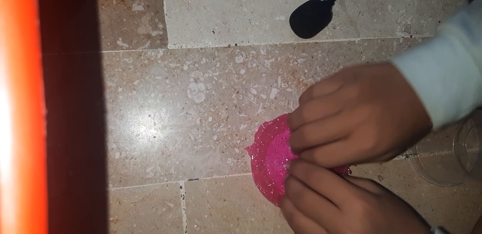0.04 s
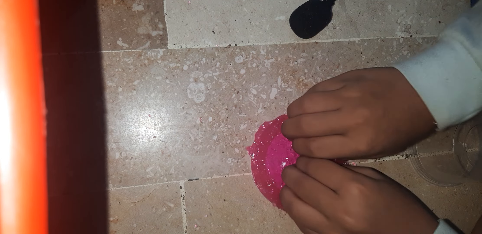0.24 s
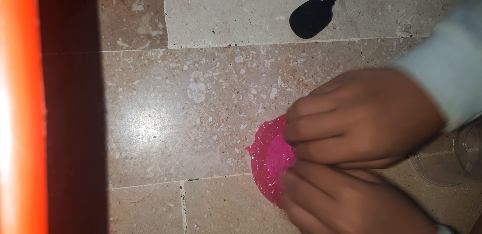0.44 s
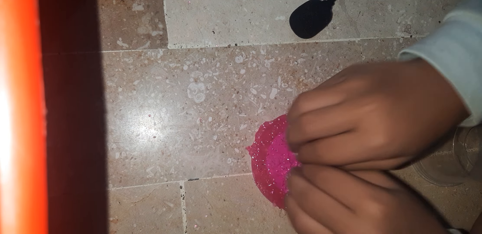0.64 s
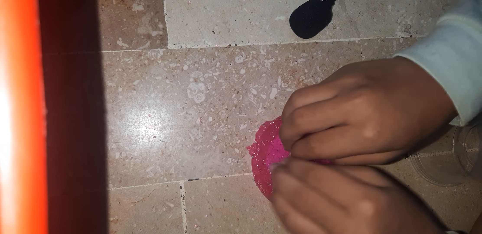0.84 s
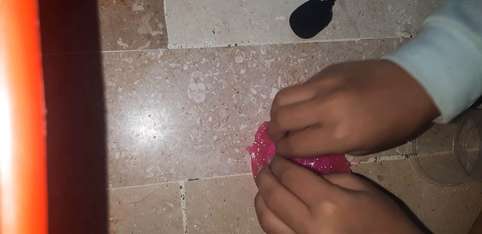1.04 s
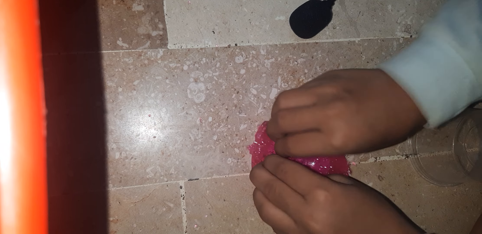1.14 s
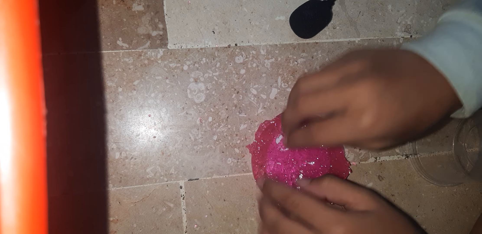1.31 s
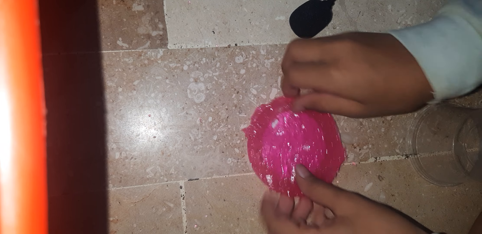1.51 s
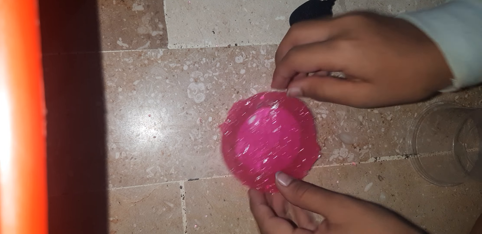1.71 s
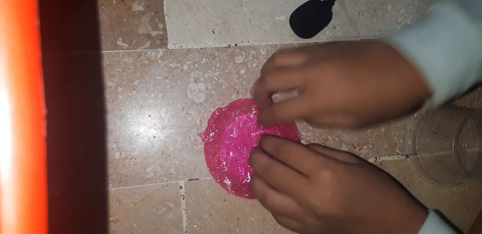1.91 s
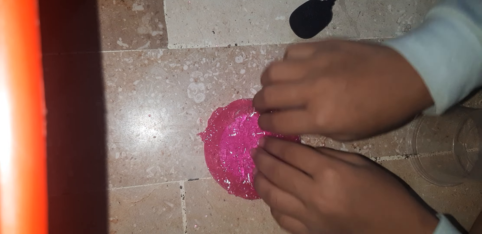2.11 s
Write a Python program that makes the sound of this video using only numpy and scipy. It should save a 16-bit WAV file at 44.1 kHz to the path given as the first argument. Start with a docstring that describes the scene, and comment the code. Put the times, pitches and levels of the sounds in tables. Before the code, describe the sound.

Close, dry slime pops and bright clicks burst unevenly through the first second, each with a short hard room ring; then quieter ticks and slippery finger slides, another loud pop, small clicks, over faint air noise and hum.

```python
"""Fingers poke and peel a lump of sticky slime on a tiled floor, close to a small microphone.
Air noise and a faint hum run from the start and sink; soon a finger slides (hiss and resonant grains)
and thin films snap (bright ticks with ring and fizz). Then skin peels (random ticks in resonances) and
air pockets pop (two hollow cavity tones and a push of air), with a hard room ringing after them.
Later come mostly slides, one more loud pop with its snap, and a few small sounds at the end."""
import sys
import numpy as np
from scipy import signal
from scipy.fft import rfft, irfft
from scipy.io import wavfile
from scipy.ndimage import uniform_filter1d

SR = 44100
rng = np.random.default_rng(int(sys.argv[2]) if len(sys.argv) > 2 else 0)


def master_out(mix):
    """Clip the mix to full scale and print it as 16-bit PCM to the path in sys.argv[1]."""
    frames = np.transpose(np.atleast_2d(mix))
    ceiling = np.clip(frames, -1, 1)
    pcm = np.round(ceiling * 32767).astype(np.int16)
    wavfile.write(sys.argv[1], SR, pcm)


def boost(x):
    """Linear amplitude factor 10**(x/20) for a level x in decibels (scalar or array-like)."""
    u = np.asarray(x, float) / 20
    return 10 ** u


N = 94815


def rms_one(x):
    """Scale a signal to an rms of 1."""
    return x / np.sqrt(np.mean(x ** 2) + 1e-20)


def in_time(rows):
    """Join (seconds, value) rows by straight lines, one value per sample."""
    s, value = np.transpose(rows)
    return np.interp(np.arange(N) / SR, s, value)


def at_hz(points, hz):
    """Read a (Hz, value) table with frequency on a log axis, as we hear pitch."""
    table_hz, value = np.array(points).T
    return np.interp(np.log(hz + 1), np.log(table_hz), value)


def colour(x, spectrum):
    """Give a signal the shape of a spectrum table, at an rms of 1."""
    hz = np.arange(N // 2 + 1) * SR / N
    return rms_one(irfft(rfft(x) * boost(at_hz(spectrum, hz)), N))


def resonate(x, hz, width_hz):
    """Ring like a small hollow or skin: a two-pole resonance, the narrower the longer."""
    r = np.exp(-np.pi * width_hz / SR)
    return signal.lfilter([1 - r], [1, -2 * r * np.cos(2 * np.pi * hz / SR), r * r], x)


def bandpass(x, edges_hz, order):
    """Keep only what lies between two frequencies."""
    return signal.sosfilt(signal.butter(order, edges_hz, "band", fs=SR, output="sos"), x)


def add(out, s, grain):
    """Mix a short sound in at a time in seconds."""
    i = int(s * SR)
    out[i:i + len(grain)] += grain[:N - i]


def stroke(s, length, edge_s):
    """Start sample and a fade-in, hold, fade-out shape with a short silent tail."""
    start = int(s * SR)
    t = np.arange(min(int((length + .01) * SR), N - start)) / SR
    return start, np.clip(np.minimum(t, length - t) / edge_s, 0, 1)


HUM_WAVER_DB = 2.5
# Colour of the air noise. Each row: frequency in Hz, relative level in dB.
AIR = [(24, -17), (60, -1.5), (130, 3.5), (324, 4), (497, 2.5), (744, -0.5), (1110, -6), (2250, -11.5),
       (7180, -18.5), (14200, -24.5), (16500, -38)]
# Loudness of the air noise; the hum follows it. Each row: time in seconds, level in dB.
AIR_LEVEL = [(0, -47.5), (.2, -48.5), (.8, -56), (1.3, -56.5), (2.15, -58.5)]
# Hum tones. Each row: frequency in Hz, middle peak level in dB over the rms of the air noise.
HUM = [(58, 0), (253, -9), (754, -7.5), (1254, -14)]


def air():
    """Coloured noise for the moving air, and steady tones whose level wavers for the hum."""
    t = np.arange(N) / SR
    out = colour(rng.standard_normal(N), AIR)
    for hz, db in HUM:
        waver = np.interp(t, np.linspace(0, t[-1], 12), rng.standard_normal(12))
        out = out + boost(db + HUM_WAVER_DB * waver) * np.sin(2 * np.pi * (hz * t + rng.random()))
    return boost(in_time(AIR_LEVEL)) * out


SLIDE_BAND_HZ, SLIDE_EDGE_S = (2100, 16000), 0.003
SLIDE_PATCHY_DB, SLIDE_PATCH_S = 5.5, 0.003
SLIDE_GRAINS_PER_S = 1800
SLIDE_WIDTH_SHARE = 0.2  # resonance width as a share of its frequency
SLIDE_OVERTONE_DB = -8  # octave relative to the resonance
# Fingers slide over the wet skin. Each row: start in seconds, length in seconds, hiss level in dB,
# resonance in Hz, level of the resonant grains in dB (the resonance gets 4 dB less, its octave 12).
SLIDES = [(0.068, 0.033, -47, 4650, -55), (1.494, 0.022, -57, 4940, -68), (1.517, 0.039, -49.5, 5160, -49),
          (1.557, 0.049, -53, 7400, -48.5), (1.61, 0.018, -45, 3800, -51), (1.626, 0.019, -58, 3760, -58),
          (1.733, 0.014, -54, 4460, -51), (1.75, 0.07, -68, 4300, -51.5), (2.087, 0.036, -59, 4850, -62)]


def slides():
    """Rubbing gives a soft hiss, patchy band by band, and grains ring a resonance and its octave."""
    edges = np.geomspace(*SLIDE_BAND_HZ, 7)
    hiss = 0
    for low, high in zip(edges, edges[1:]):
        patch = rms_one(uniform_filter1d(rng.standard_normal(N), int(SLIDE_PATCH_S * SR)))
        band = bandpass(rng.standard_normal(N), [low, high], 1)
        hiss = hiss + band * boost(SLIDE_PATCHY_DB * uniform_filter1d(patch, 100))
    hiss = rms_one(hiss)
    grains = rng.standard_normal(N) * (rng.random(N) < SLIDE_GRAINS_PER_S / SR)
    out = np.zeros(N)
    for s, length, hiss_db, hz, tone_db in SLIDES:
        i, shape = stroke(s, length, SLIDE_EDGE_S)
        j = i + len(shape)
        tone = 0
        for k in (1, 2):
            width_hz = k * SLIDE_WIDTH_SHARE * hz
            once = resonate(grains[i:j], k * hz, width_hz)
            twice = resonate(once, k * hz, width_hz)
            tone = tone + boost(SLIDE_OVERTONE_DB * (k - 0.5)) * rms_one(twice)
        add(out, s, shape * (boost(hiss_db) * hiss[i:j] + boost(tone_db) * tone))
    return out


SNAP_WIDTH_PER_SPREAD = 1.15
SNAP_FIZZ_DB, SNAP_FIZZ_T60_S = -19, 0.012  # level against the tick, time to fall 60 dB
SNAP_RING_DB, SNAP_RING_T60_S = -18, 0.005
# Thin films snap. Each row: time in seconds, tick level in dB, centre in Hz, spread in Hz.
SNAPS = [(0.0732, -20.5, 5270, 2700), (0.0776, -25, 4450, 1320), (0.2287, -8, 5100, 3000),
         (0.2337, -9, 11700, 2830), (0.241, -13.5, 6100, 3200), (0.297, -27.5, 11200, 1930),
         (0.3601, -25.5, 4500, 2820), (0.3674, -20.5, 5600, 1920), (0.48, -21, 7700, 2670),
         (0.4848, 0.5, 5160, 1700), (0.4972, -15, 7150, 3190), (0.5524, -14.5, 11500, 1830),
         (0.5741, -22.5, 6660, 1090), (0.7151, -14, 7100, 3460), (0.716, -6, 6850, 3570),
         (0.7197, -7, 12200, 1810), (0.7369, -28, 8100, 2070), (0.819, -12.5, 8400, 4000),
         (0.9223, -14, 7600, 3800), (0.9268, -6, 7500, 3500), (0.9302, -14, 7000, 2400),
         (0.9513, 0, 7200, 2900), (1.0606, -8.5, 9660, 2400), (1.0729, -25.5, 9900, 3510),
         (1.1276, -19, 8500, 3400), (1.1351, -9, 8000, 4200), (1.1668, -19, 8500, 3400),
         (1.4936, -31, 6000, 4500), (1.5864, -32, 8000, 2400), (1.2396, -25.5, 7600, 2500),
         (1.2902, -30.5, 9910, 2950), (1.3649, -27.5, 6280, 3000), (1.366, -28, 6280, 3000),
         (1.4552, -28.5, 8400, 4060), (1.46, -30, 6100, 3360), (1.598, -29, 7500, 3000),
         (1.6769, -33, 5730, 1400), (1.73, -22, 5000, 1680), (1.814, -1.5, 6630, 3100),
         (1.9231, -21.5, 6470, 3600), (1.9434, -13, 7600, 3600), (1.948, -25.5, 7000, 4000),]


def snaps():
    """A tearing film gives a very short tick, a brief ring and a dying fizz around the tick's pitch."""
    out, lead = np.zeros(N), 32  # samples ahead of the tick's middle
    t = (np.arange(900) - lead) / SR
    after = np.maximum(t, 0)
    for s, db, hz, spread_hz in SNAPS:
        phase, shift = rng.random(2)
        width_hz = SNAP_WIDTH_PER_SPREAD * spread_hz
        tick = np.cos(2 * np.pi * (hz * t + phase)) * np.exp(-2 * (np.pi * width_hz * t) ** 2)
        edges = np.clip([hz - 1.5 * width_hz, hz + 1.5 * width_hz], 1500, 17000)
        fizz = rms_one(bandpass(rng.standard_normal(len(t)), edges, 1))
        fizz = fizz * (t > 0) * boost(SNAP_FIZZ_DB - 60 * after / SNAP_FIZZ_T60_S)
        ring_hz = hz * (.5 + 0.57 * shift)
        ring = np.sin(2 * np.pi * ring_hz * after) * boost(SNAP_RING_DB - 60 * after / SNAP_RING_T60_S)
        add(out, s - lead / SR, boost(db) * (tick + fizz + ring))
    return out


PEEL_SIZE_DB, PEEL_EDGE_S = 2.5, 0.003  # unevenness of the ticks, fade at each end
PEEL_SPAN_OCTAVES = 1.1  # how far the resonances reach around the centre
PEEL_WIDTH_SHARE = 0.25  # resonance width as a share of its frequency
# Skin peels off in crackle. Each row: start in seconds, length in seconds, level in dB,
# ticks per second, centre in Hz.
PEEL = [(0.221, 0.015, -36.5, 3800, 2500), (0.238, 0.14, -58.5, 780, 5850), (0.353, 0.026, -51, 520, 6400),
        (0.473, 0.025, -37, 2600, 4170), (0.493, 0.043, -51.5, 4200, 4600), (0.543, 0.073, -52, 470, 7740),
        (0.708, 0.017, -40.5, 3400, 7960), (0.805, 0.036, -54.5, 1200, 10100),
        (0.914, 0.018, -44, 1300, 5870), (1.005, 0.073, -55.5, 790, 7550), (1.1259, .015, -37, 4500, 3200),
        (1.157, 0.017, -43.5, 6000, 4600), (1.813, 0.0072, -34, 4200, 5640), (1.214, 0.056, -61, 770, 7900),
        (1.28, 0.027, -59, 640, 8500), (1.941, 0.0185, -49.5, 1800, 7000), (2.011, 0.027, -61.5, 990, 3860)]


def peel():
    """Skin lets go in random ticks of uneven size, dealt to short resonances around a centre."""
    sizes = boost(PEEL_SIZE_DB * np.minimum(rng.exponential(1, N), 3)) * rng.choice([-1, 1], N)
    draw, dealt = rng.random(N), rng.integers(0, 14, N)
    out = np.zeros(N)
    for s, length, db, per_s, centre_hz in PEEL:
        i, shape = stroke(s, length, PEEL_EDGE_S)
        j = i + len(shape)
        ticks = sizes[i:j] * (draw[i:j] < per_s / SR) * shape
        crackle = 0
        for k, hz in enumerate(np.geomspace(900, 15500, 14)):
            ring = resonate(ticks * (dealt[i:j] == k), hz, PEEL_WIDTH_SHARE * hz)
            even = np.sin(2 * np.pi * hz / SR) * np.sqrt(centre_hz / hz)  # evens out the resonances
            nearness = np.exp(-.5 * (np.log2(hz / centre_hz) / PEEL_SPAN_OCTAVES) ** 2)
            crackle = crackle + ring * even * nearness
        add(out, s, boost(db) * rms_one(crackle))
    return out


LONG_RING_T60_S, BRIEF_RING_T60_S = 0.016, 0.0084  # time to fall 60 dB
POP_RING_SHARE, POP_PUSH_SHARE = 0.78, 0.6
# Air pockets pop. Each row: time in seconds, level in dB before the ring and push shares,
# long-ringing cavity in Hz, brief cavity in Hz, brief cavity in dB relative to the long one.
POPS = [(0.2277, -0.5, 596, 1340, -13.5), (0.2343, -17, 650, 1330, -7), (0.3624, -30, 1170, 1190, 5),
        (0.4848, 1.5, 645, 1315, -3.5), (0.7158, -1.5, 645, 1400, 4.5), (0.9194, -30, 700, 1330, -6),
        (0.9224, -18, 1420, 400, -6), (0.9269, -8.5, 680, 1450, 0), (1.0609, -24.5, 690, 1370, -0.5),
        (1.1298, -26, 250, 1500, 4), (1.131, -30, 250, 3000, 6), (1.1366, -18, 560, 380, -2),
        (1.14, -28, 300, 500, -4), (1.1655, -33, 300, 1500, 10), (1.1702, -24, 370, 1480, -0.5),
        (1.3657, -33, 300, 1480, 0), (1.4618, -35, 231, 1180, -51), (1.81412, -10, 3550, 3000, -6),
        (1.81438, -8, 720, 1020, 10), (1.9223, -26.5, 676, 1300, -22), (1.948, -25.5, 206, 1270, -16)]


def pops():
    """A bursting pocket gives a suck, a push of air, and two cavity tones that die away."""
    out, lead = np.zeros(N), 64  # samples ahead of the burst
    t = (np.arange(1200) - lead) / SR
    after = np.maximum(t, 0)
    for s, db, long_hz, brief_hz, brief_db in POPS:
        long_share = 1 / (1 + boost(brief_db))
        mean_hz = long_share * long_hz + (1 - long_share) * brief_hz
        unit_s = 0.17 / mean_hz  # lower pockets burst more slowly
        rise = np.exp(-(np.minimum(t, 0) / (0.37 * unit_s)) ** 2)
        long_tone = np.cos(2 * np.pi * long_hz * t - .4) * boost(-60 * after / LONG_RING_T60_S)
        brief_tone = np.cos(2 * np.pi * brief_hz * t - .4) * boost(-60 * after / BRIEF_RING_T60_S)
        ring = rise * (long_share * long_tone + (1 - long_share) * brief_tone)
        suck = .5 * np.exp(-((t + 1.935 * unit_s) / (0.92 * unit_s)) ** 2)
        push = np.exp(-after / (0.29 * unit_s)) * rise - suck
        add(out, s - lead / SR, boost(db) * (POP_RING_SHARE * ring + POP_PUSH_SHARE * push))
    return out


ROOM_DB, ROOM_ONSET_S = -11, 0.0013  # gain of the tail, length of its fade-in
ROOM_MODES_HZ, ROOM_MODE_DB, ROOM_MODE_T60_S = (593, 703, 745), -28, 0.75  # lingering resonances
# How long the room rings. Each row: frequency in Hz, time to fall 60 dB in seconds.
ROOM_T60 = [(100, 0.45), (700, 0.52), (1500, 0.34), (4000, 0.32), (15000, 0.086)]
# How strongly the room rings. Each row: frequency in Hz, relative level in dB.
ROOM_COLOUR = [(100, 8.5), (520, 0.5), (640, -4.5), (760, 2.5), (1500, -2), (3500, -2), (7000, -6),
               (15000, 1)]


def room(x):
    """Hard walls scatter sound: third-octave noise bands die at their own rates, with a few modes."""
    t = np.arange(SR) / SR
    edges = 80 * 2 ** np.arange(0, 7.8, 1 / 3)
    tail = 0
    for low, high in zip(edges, edges[1:]):
        band = bandpass(rng.standard_normal(SR), [low, high], 2)
        tail = tail + band * boost(at_hz(ROOM_COLOUR, low) - 60 * t / at_hz(ROOM_T60, low))
    for hz in ROOM_MODES_HZ:
        mode = np.sin(2 * np.pi * (hz * t + rng.random()))
        tail = tail + mode * boost(ROOM_MODE_DB - 60 * t / ROOM_MODE_T60_S)
    tail = tail * np.clip(t / ROOM_ONSET_S - .5, 0, 1) / np.sqrt(SR / 20)
    return boost(ROOM_DB) * signal.fftconvolve(x, tail)[:N]


ECHO_S, ECHO_DB, ECHO_HZ, ECHO_WIDTH_HZ = 0.033, -26, 692, 28


def echo(x):
    """A far wall returns one late, dull reflection, narrowed to a band."""
    late = np.pad(x, (int(ECHO_S * SR), 0))[:N]
    return boost(ECHO_DB) * resonate(late, ECHO_HZ, ECHO_WIDTH_HZ)


SLIME_CUT_HZ = 75
# The hands come closer and in the end the room's share sinks.
# Each row: time in seconds, level sent to the room and echo in dB.
WET = [(0, -0.5), (.8, 0.5), (1.8, -4)]


def scene():
    """Slime close by without its deepest bass, its room tail and echo, and the air."""
    slime = slides() + snaps() + peel() + pops()
    slime = signal.sosfilt(signal.butter(2, SLIME_CUT_HZ, "high", fs=SR, output="sos"), slime)
    far = slime * boost(in_time(WET))
    return (air() + slime + room(far) + echo(far))[None]


def low_pass(x):
    """Removes everything above the highest recorded frequency."""
    return signal.sosfilt(signal.butter(12, 16820, fs=SR, output="sos"), x)


MIC_CUT_HZ = 54


def record(dry):
    """The microphone drops the deep bass, and peaks stop at full scale."""
    thin = signal.sosfilt(signal.butter(3, MIC_CUT_HZ, "high", fs=SR, output="sos"), dry)
    mix = np.clip(thin, -1, 1)
    return low_pass(mix)


dry = scene()
out = record(dry)
master_out(out)
```